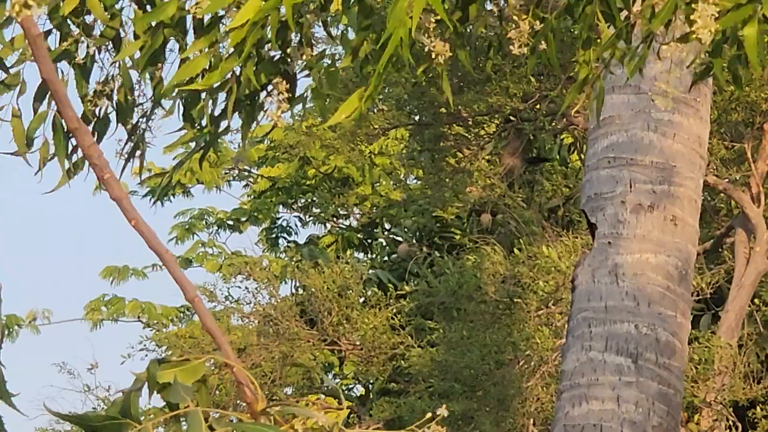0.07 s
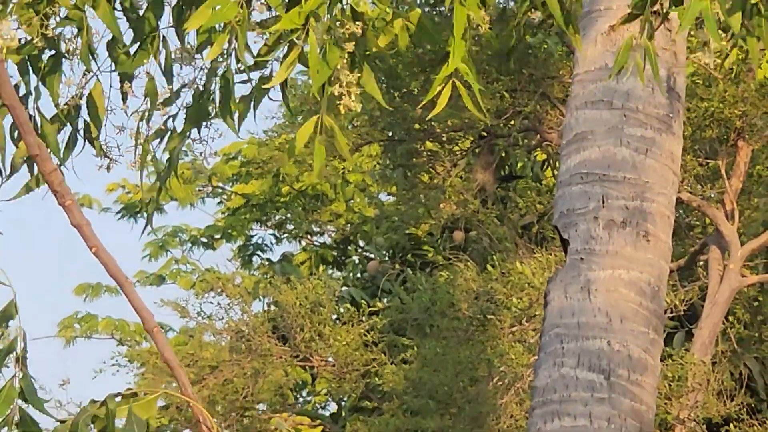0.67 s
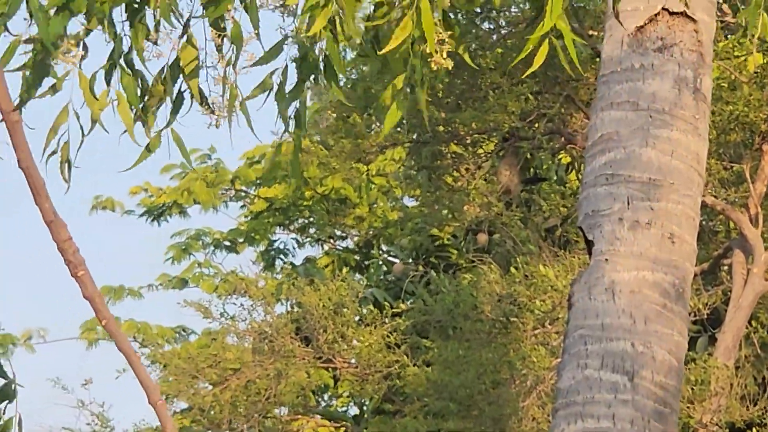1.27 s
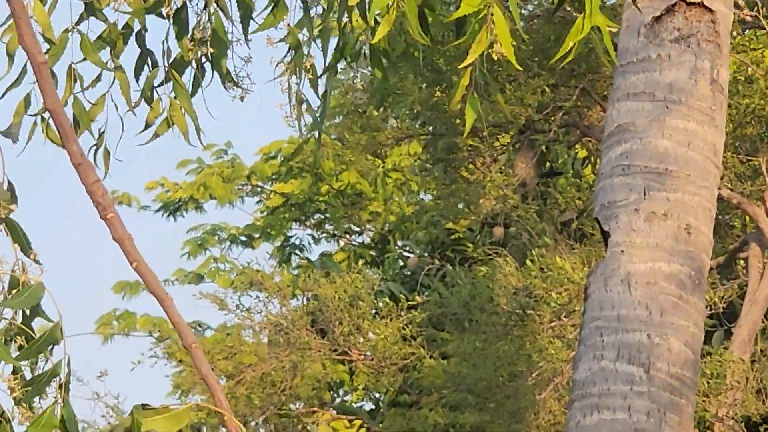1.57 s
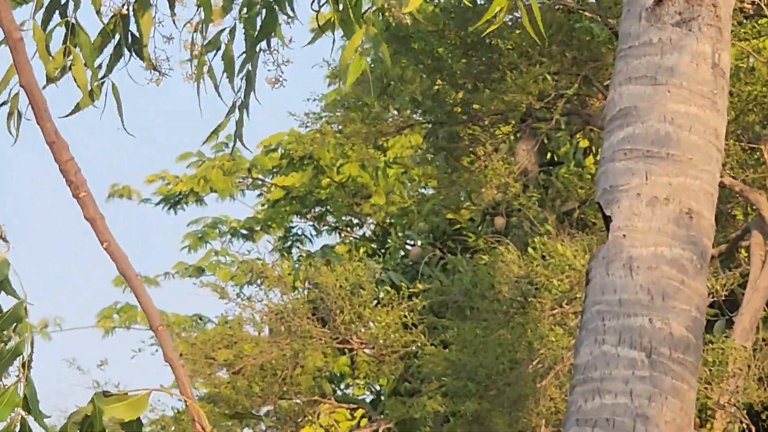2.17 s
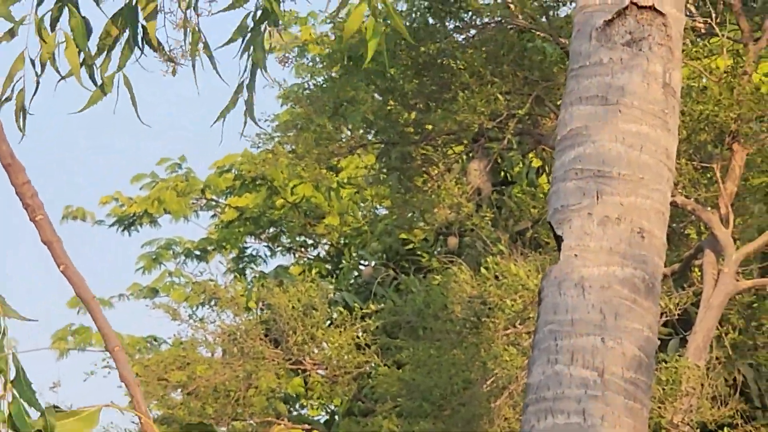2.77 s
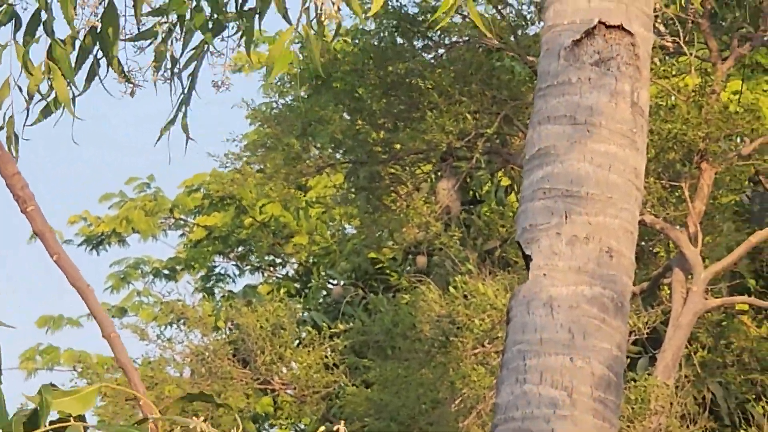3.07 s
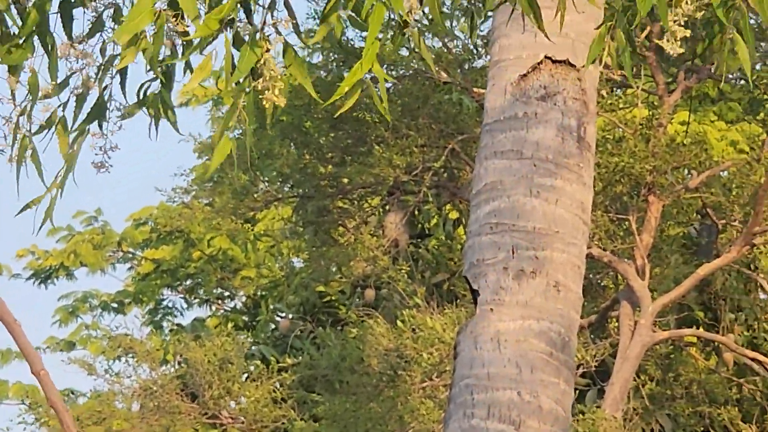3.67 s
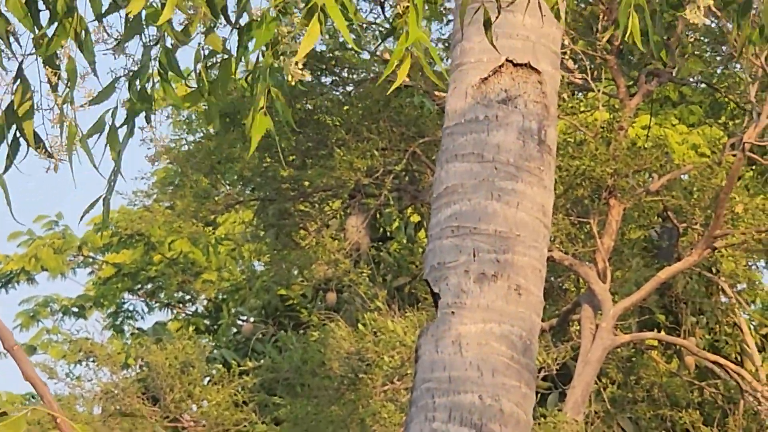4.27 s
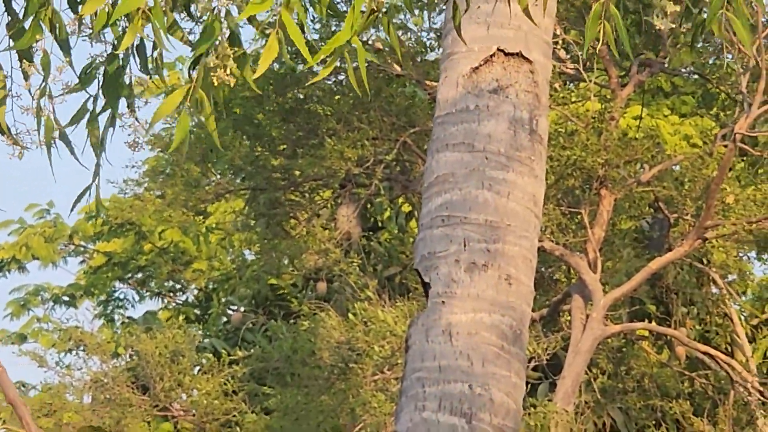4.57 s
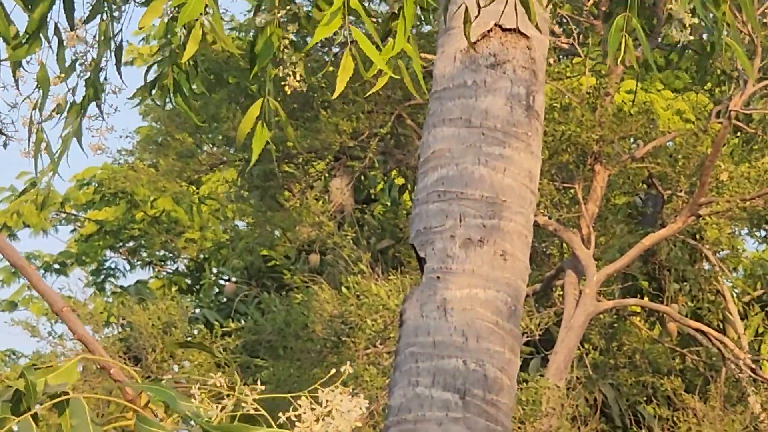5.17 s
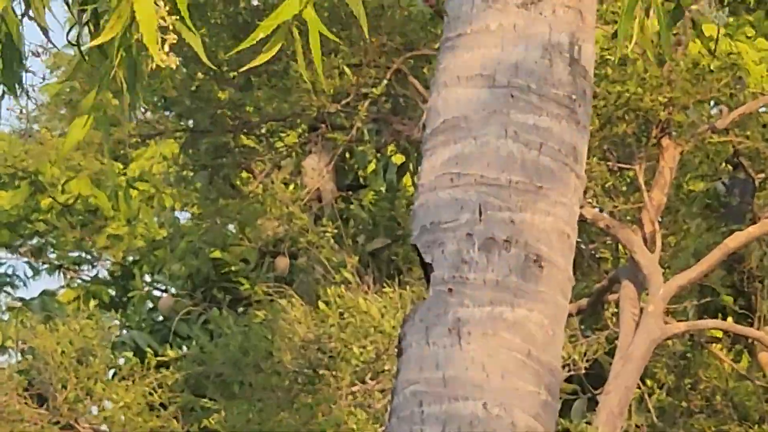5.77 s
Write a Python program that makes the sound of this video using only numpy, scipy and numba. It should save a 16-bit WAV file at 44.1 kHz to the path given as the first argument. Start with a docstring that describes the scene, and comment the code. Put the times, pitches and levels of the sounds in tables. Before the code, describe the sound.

Two birds trade loud, harsh rasping calls in overlapping rhythmic bursts among trees, over a faint breeze.

```python
"""A chachalaca's harsh rasp comes first, then its repeated four-syllable motif; a darker-voiced bird
answers with quickening stutters. Each rasp is an uneven train of syrinx pulses exciting the resonances
of throat, windpipe and beak; now and then a voice breaks into a clear, periodic squeal. Trunks and
leaves scatter the calls, the grove reverberates and murmurs, and a breeze buffets the microphone."""
import sys
import numpy as np
from scipy import signal
from scipy.fft import rfft, irfft, next_fast_len
from scipy.io import wavfile
from scipy.ndimage import uniform_filter1d
from numba import njit

SR = 44100
rng = np.random.default_rng(int(sys.argv[2]) if len(sys.argv) > 2 else 0)


def materialize(psi):
    """Save the field psi as 16-bit PCM at rate SR to the path in sys.argv[1].

    A 1-D psi becomes a single channel; in a 2-D psi each row is a channel.
    """
    bounded = np.clip(np.atleast_2d(psi).T, -1, 1)
    quanta = np.round(bounded * 32767).astype(np.int16)
    wavfile.write(sys.argv[1], SR, quanta)


N = 257103

# clear notes: start t/s, end t/s, first f/Hz, middle f/Hz, last f/Hz, level/dB, throat f/Hz
SQUEALS = [(0.785, 0.898, 302, 316.7, 300.6, -34.5, 1359), (1.217, 1.256, 601, 610.4, 553, -16.5, 1329),
           (1.812, 1.939, 461, 494, 530, -42, 2530), (1.956, 2.055, 517, 545, 584, -38, 2870),
           (2.093, 2.128, 640, 655, 669, -12.5, 1217), (2.97, 3.028, 622, 656.6, 667.6, -11, 1250),
           (3.235, 3.273, 658, 643.4, 614, -12, 2110), (4.255, 4.328, 240.7, 269.5, 282, -37, 1190),
           (4.566, 4.598, 518, 496, 504, -22, 1008), (4.915, 4.947, 545.5, 503, 475, -18.5, 1000),
           (5.237, 5.319, 495.3, 523.6, 559, -21, 2053), (5.755, 5.791, 535, 503, 479, -15, 1020)]
# resonances of windpipe and beak: f/Hz, width/Hz, bright bird's level/dB, dark bird's level/dB
TRACT = [(531, 148, -13.5, -10), (963, 135, -1, -1.5), (1397, 300, -2, 0.5), (1850, 337, 0, 0.5),
         (2100, 193, 1.5, 4), (2436, 810, -7.5, -5), (3165, 453, -1, -1), (3651, 554, -3, -10),
         (4196, 124, -2, -13), (4424, 390, -7.5, -16), (5230, 1930, -15, -22.5), (7320, 2130, -17.5, -27.5),
         (9240, 2600, -26, -39), (12310, 3200, -30.5, -42.5), (15050, 2500, -29.5, -45.5)]
BRIGHT, DARK = 2, 3  # each bird's column in TRACT


def bright_bird(single_treble_db=-9):
    """Nearly regular pulses give a pitched rasp, sung singly and in a four-syllable motif."""
    # syllables of the motif: offset t/s, length/s, accent/dB, throat f/Hz, throat level/dB
    motif = [(0, 0.033, 0, 1075, -10.5), (0.073, 0.031, 2, 1048, -5.5), (.136, 0.065, .5, 1096, -11.5),
             (0.279, 0.085, -1.5, 1025, -3)]
    # repeats of the motif: start t/s, time stretch, level/dB, treble level/dB
    repeats = [(0.137, 0.997, -19.5, -8), (1.359, 1.028, -16, -7.5), (2.198, 0.99, -17.5, -9),
               (3.099, 1.02, -17.5, -6)]
    # single rasps: start t/s, end t/s, level/dB, throat f/Hz, throat level/dB
    singles = [(0.004, 0.072, -17, 1060, -3), (1.185, 1.232, -24, 1420, 2.5),
               (1.256, 1.292, -17.5, 1065, -1.5), (2.046, 2.102, -18.5, 1743, 1.5),
               (2.128, 2.146, -22.5, 1007, -8), (2.945, 2.975, -26.5, 1756, 8),
               (3.03, 3.046, -28.5, 982, -3.5), (3.79, 3.88, -20.5, 1005, -11),
               (4.622, 4.652, -30, 1007, 8.5), (4.845, 4.9, -20, 960, 0), (5.545, 5.58, -22, 1845, 10),
               (5.688, 5.715, -20, 1016, -1)]
    syllables = []
    for start, stretch, db, treble_db in repeats:
        for offset, length, accent_db, throat_hz, throat_db in motif:
            onset = start + stretch * offset
            syllables.append((onset, onset + length, db + accent_db, throat_hz, throat_db, treble_db))
    syllables += [(*row, single_treble_db) for row in singles]
    voice = rasps(syllables, BRIGHT, pulse_hz=303.3, jitter=.028, breath=.23, throat_width_hz=92,
                  sag=.055, attack_s=.005, release_s=.0095, shine=.19, ring_db=0, body_db=-.26)
    dip_db = np.zeros(N)
    for start, end, *_ in SQUEALS:  # the rasp gives way while the voice breaks into a squeal
        at, _, pressure = effort(start, end, attack_s=.0032, release_s=.004)
        dip_db[at] -= 9 * pressure
    return voice * undb(dip_db)


def dark_bird(throat_hz=1291, stutter_s=.028, quicken=.93, hold_s=.072, pause_s=.074, single_treble_db=-9):
    """Strong jitter makes a harsher voice; the intervals of its stutter shrink geometrically."""
    # phrases: opening t/s, stutter start t/s, first interval/s, stutter end t/s, level/dB,
    # swell per syllable/dB, throat level/dB, treble level/dB
    phrases = [(2.333, 2.442, .0505, 2.705, -24, 0.6, 4.5, -6),
               (3.337, 3.438, .053, 3.72, -19.5, -0.07, 4.5, -4),
               (4.513, 4.566, .057, 4.915, -18, 0.43, 1.5, -8),
               (5.479, 5.533, .054, 5.83, -19, 1.12, 1, -9)]
    # stray rasps: start t/s, end t/s, level/dB, throat f/Hz, throat level/dB
    singles = [(1.558, 1.61, -23.5, 1397, -3.5), (1.748, 1.818, -25, 1310, 1),
               (1.912, 1.952, -29.5, 1305, 5.5), (3.997, 4.028, -29.5, 1007, -2.5),
               (4.29, 4.382, -29, 1137, -2.5), (4.446, 4.475, -24, 920, -4.5), (5.24, 5.3, -20, 1210, -8),
               (5.368, 5.4, -18, 1096, -15), (5.423, 5.456, -17.5, 1810, 4.5),
               (5.423, 5.445, -25.5, 1277, 7)]
    opening_s, closing_s = .056, .092
    openings, syllables = [], []
    for opening, start, interval, end, db, swell_db, throat_db, treble_db in phrases:
        openings.append((opening, opening + opening_s, -15, throat_hz, -2.5, single_treble_db))
        while end - start > hold_s:
            syllables.append((start, start + stutter_s, db, throat_hz, throat_db, treble_db))
            start, interval, db = start + interval, interval * quicken, db + swell_db
        syllables.append((start, end, db, throat_hz, throat_db, treble_db))  # the last one is held
        closing = end + pause_s
        if closing < N / SR:
            syllables.append((closing, closing + closing_s, -19, throat_hz, 2, -3.5))
    syllables += [(*row, single_treble_db) for row in singles]
    harsh = dict(bird=DARK, pulse_hz=319.4, jitter=.09, breath=.41, throat_width_hz=85,
                 sag=.045, release_s=.0083, shine=.49, ring_db=.45, body_db=-.68)
    return rasps(syllables, attack_s=.0065, **harsh) + rasps(openings, attack_s=.02, **harsh)


def rasps(syllables, bird, pulse_hz, jitter, breath, throat_width_hz, sag, attack_s, release_s,
          shine, ring_db, body_db, split_hz=2800):
    """Source and filter: pitch and resonances arch and sag as the air pressure rises and gives out."""
    out = np.zeros(N)
    for start, end, db, throat_hz, throat_db, treble_db in syllables:
        length = (end - start) / .06  # relative to a 60 ms syllable
        # short syllables start abruptly; long ones go on swelling and fade more slowly
        at, progress, pressure = effort(start, end, attack_s * length ** .5, release_s * length ** .5)
        hump = 1 - (2 * progress - 1) ** 2
        pressure *= undb(.65 * length * (hump - 1))
        arch = 1 + sag * (hump - progress / 2 - .45)
        wander = np.exp(.07 * rng.standard_normal() + .04 * walk(len(at), rate=60))
        source = syrinx(pulse_hz * arch ** 2 * wander, jitter, breath)
        # a forceful syllable has sharper slaps and so a brighter top
        tilt_db = shine * (db + treble_db + 28)
        voiced = windpipe_and_beak(source, bird, arch, tilt_db, split_hz) * pressure
        body = shape(voiced, lambda f: 1 / np.sqrt(1 + (f / split_hz) ** 20))
        treble = (voiced - body) * (2 + hump)
        # the throat rings most purely in short, low syllables
        width_hz = throat_width_hz * (throat_hz / 1000) ** 2 * length ** .29
        throat = resonance(source, throat_hz * arch ** .55, width_hz)
        # it pulls the membranes along and so holds its own swing fairly steady
        swing = np.abs(signal.hilbert(throat)) + np.std(throat) / 2
        throat = throat / swing * pressure
        voice = level(body, body_db) + level(throat, throat_db + ring_db) + level(treble, treble_db)
        out[at] += undb(db) * voice * np.sqrt((end - start) * SR / len(at))
    return out


def effort(start, end, attack_s, release_s, margin_s=.03):
    """Driving pressure of one syllable, returned after its sample positions and progress from 0 to 1."""
    at = np.arange(max(int((start - margin_s) * SR), 0), min(int((end + 2 * margin_s) * SR), N))
    t = at / SR
    progress = np.clip((t - start) / max(end - start, attack_s), 0, 1)
    pressure = (1 + np.tanh((t - start) / attack_s)) * (1 + np.tanh((end - t) / release_s)) / 4
    return at, progress, pressure


def syrinx(hz, jitter, breath, shimmer_db=2.5):
    """Jitter and shimmer: the membranes slap unevenly, and air hisses through after each slap."""
    timing, strength = rng.standard_normal((2, 128))
    cycles = np.cumsum(hz) / SR
    slaps = np.cumsum(np.exp(jitter * timing)) - 2
    latest = np.clip(np.searchsorted(slaps, cycles) - 1, 0, len(slaps) - 1)
    size = undb(shimmer_db * strength)[latest]
    pulses = np.diff(latest, prepend=latest[0]) * size
    hiss = size * np.exp(-np.abs(cycles - slaps[latest]) / .7) * rng.standard_normal(len(hz))
    return level(pulses, 0) + breath * level(hiss, 0)


def windpipe_and_beak(source, bird, bend, tilt_db, split_hz, flutter_db=3):
    """Parallel formants bend together and flutter in strength, tilted per octave above the split."""
    out = 0
    for k, row in enumerate(TRACT):
        hz, width_hz = row[:2]
        octaves = max(np.log2(hz / split_hz), 0)
        db = row[bird] + tilt_db * octaves + flutter_db * walk(len(source), rate=45.9)
        out += (-1) ** k * undb(db) * resonance(source, hz * bend, width_hz)
    return out


def resonance(x, hz, width_hz):
    """Two resonators in cascade make one peak with steep skirts."""
    return bandpass(bandpass(x, hz, float(width_hz)), hz, float(width_hz))


@njit
def bandpass(x, hz, width_hz):
    """A damped second-order resonator whose centre moves from sample to sample."""
    y, band_state, low_state = np.empty(len(x)), 0., 0.
    for i in range(len(x)):
        g, damping = np.tan(np.pi * hz[i] / SR), width_hz / hz[i]
        band = (band_state + g * (x[i] - low_state)) / (1 + g * (g + damping))
        band_state = 2 * band - band_state
        low_state += 2 * g * band
        y[i] = damping * band
    return y


def squeals(throat_db=12, throat_width_hz=140, hoarse_db=-24):
    """Periodic oscillation: the membranes swing evenly and the throat lifts the nearest harmonic."""
    out = np.zeros(N)
    order = np.arange(1, 24)[:, None]
    for start, end, first, middle, last, db, throat_hz in SQUEALS:
        at, progress, pressure = effort(start, end, attack_s=.0094, release_s=.0035)
        glide = np.polyval(np.polyfit([0, .5, 1], [first, middle, last], 2), progress)
        partials = order * glide * (1 + .0082 * walk(len(at), rate=500))
        lift = 1 + undb(throat_db) / (1 + (2 * (partials - throat_hz) / throat_width_hz) ** 2)
        cutoff_hz = 7000 * undb((db + 16) / 2)  # soft notes are duller than loud ones
        rolloff = 1 / np.hypot(1, (partials / cutoff_hz) ** 3)
        flutter = undb(2 * np.array([walk(len(at), rate=79) for _ in order]))
        phase = 2 * np.pi * (np.cumsum(partials, axis=1) / SR + rng.random(order.shape))
        tone = (tract_gain(partials, BRIGHT) * lift * rolloff * flutter * np.sin(phase)).sum(0)
        hoarse = shape(rng.standard_normal(len(at)), lambda f: tract_gain(f, DARK))
        out[at] += (level(tone, db) + level(hoarse, db + hoarse_db)) * pressure
    return out


def tract_gain(hz, bird):
    """Frequency response of windpipe and beak: the formants add in power, with deep valleys between."""
    peaks = [undb(row[bird]) / (1 + (2 * (hz - row[0]) / row[1]) ** 2) for row in TRACT]
    return np.sqrt(sum(peak ** 2 for peak in peaks))


def leaf_scatter(calls, crossover_hz=1650):
    """Scattering by trunks and leaves smears the treble in time, differently on each side."""
    burst = rng.standard_normal((2, SR)) * undb(-60 * np.arange(SR) / SR / .084)
    # keeping only the phase leaves the colour nearly alone
    response = irfft(np.exp(1j * np.angle(rfft(burst))), SR)[:, :SR // 10]
    response /= np.sqrt((response ** 2).sum(1, keepdims=True))
    share = lambda f: .85 * f ** 3 / (f ** 3 + crossover_hz ** 3)
    direct = shape(calls, lambda f: np.sqrt(1 - share(f) ** 2))
    return direct + signal.fftconvolve(shape(calls, share)[None], response, axes=1)[:, :N]


def grove_reverberation(calls, gain_db=-15):
    """Reverberation: a diffuse tail decays exponentially, each band at its own rate."""
    # decay of the grove: f/Hz, T60/s, relative level/dB
    decay = [(300, 0.4, 10), (1000, 0.41, 5.5), (1350, 1, -4.5), (2140, 0.4, 12.5), (2950, 0.85, 1),
             (5700, 0.28, 10.5), (14900, 0.07, 23)]
    hz, t, cells = signal.stft(rng.standard_normal((2, SR)), SR, nperseg=256)
    fade = undb(along(hz, decay, column=2)[:, None] - 60 * t / along(hz, decay)[:, None])
    tail = signal.istft(cells * fade, SR)[1][:, :SR] / np.sqrt(SR / 20)
    return undb(gain_db) * signal.fftconvolve(calls[None], tail, axes=1)[:, :N]


def microphone_ports(calls):
    """Level and phase differences between the two ports place the calls in the stereo image."""
    # left port relative to right: f/Hz, level/dB, phase lead/rad
    ports = [(500, 4, 0.41), (1430, -2.5, 0.59), (2490, 0.5, 1.25), (3870, 5.5, 2.06), (8000, -2.5, 1.85)]
    side = np.array([[.5], [-.5]])
    return shape(calls, lambda f: undb(side * along(f, ports)) * np.exp(1j * side * along(f, ports, 2)))


def breeze(gain_db=1.17, gust_db=2.07, lean_db=1):
    """Turbulence: eddies thump on the microphone ports as the gusts come and go."""
    # strength of the breeze: t/s, relative level/dB
    strength = [(0.0, -23), (0.08, -22), (0.39, -41), (1.38, -34.5), (1.85, -23), (1.91, -35.5),
                (2.84, -32.5), (3.21, -45.5), (3.26, -30), (4.35, -32.5), (4.43, -47.5), (5.07, -23.5),
                (5.29, -45), (5.31, -28), (5.62, -27), (5.83, -37.5)]
    # spectrum of the buffeting: f/Hz, relative density/dB
    buffet = [(20, -6), (45, 1.5), (75, 6.5), (120, -2), (200, -8), (330, -26), (700, -57.5)]
    db = np.interp(np.arange(N) / SR, *np.transpose(strength)) + gain_db
    lean = lean_db * np.array([[-1], [1]])
    return stereo_noise(buffet, common=.86) * undb(db + gust_db * walk(N, rate=25) + lean)


def grove_murmur(db=-41):
    """Ambient noise: a quiet broadband floor whose level wavers slightly."""
    # spectrum of the quiet grove: f/Hz, relative density/dB
    murmur = [(100, 11), (400, -3.5), (700, -3.5), (1000, -1.5), (1500, -4), (2050, 2.5), (2700, -13.5),
              (4500, -24), (7000, -30), (15000, -33)]
    return stereo_noise(murmur, common=.75) * undb(db + walk(N, rate=6.7))


def stereo_noise(spectrum, common):
    """Partial coherence: coloured noise of unit rms with a part common to both sides."""
    noise = rng.standard_normal((2, N)) + common * rng.standard_normal(N)
    return level(shape(noise, lambda f: undb(along(f, spectrum))), 0)


def undb(db):
    """Decibels to amplitude ratio."""
    return 10 ** (np.asarray(db) / 20)


def level(x, db):
    """Scale to an rms level."""
    return x * undb(db) / np.sqrt(np.mean(x ** 2) + 1e-18)


def along(hz, table, column=1):
    """Interpolate a column of a spectrum table on a log-frequency axis."""
    table = np.array(table, float)
    return np.interp(np.log(hz + 1), np.log(table[:, 0]), table[:, column])


def shape(x, gain):
    """Linear filtering: multiply the spectrum by a gain given as a function of frequency."""
    size = next_fast_len(x.shape[-1] + 2048)
    hz = np.arange(size // 2 + 1) * SR / size
    return irfft(rfft(x, size) * gain(hz), size)[..., :x.shape[-1]]


def walk(size, rate):
    """Smooth random modulation with a spread near 1, drawn `rate` times a second."""
    step = max(int(SR / rate), 2)
    held = np.repeat(rng.standard_normal(size // step + 2), step)
    return np.sqrt(2) * uniform_filter1d(held, step)[:size]


def scene():
    """Superposition of both birds among the trees, the grove's murmur and the breeze."""
    calls = bright_bird() + dark_bird() + squeals()
    among_trees = leaf_scatter(calls) + grove_reverberation(calls)
    return microphone_ports(among_trees) + grove_murmur() + breeze()


def record(dry, top_hz=15800):
    """Soft saturation rounds the highest peaks and a steep low-pass cuts the top."""
    rounded = dry / (1 + dry ** 4) ** .25
    return signal.sosfilt(signal.ellip(10, .2, 80, top_hz, fs=SR, output="sos"), rounded)


dry = scene()
out = record(dry)
materialize(out)
```